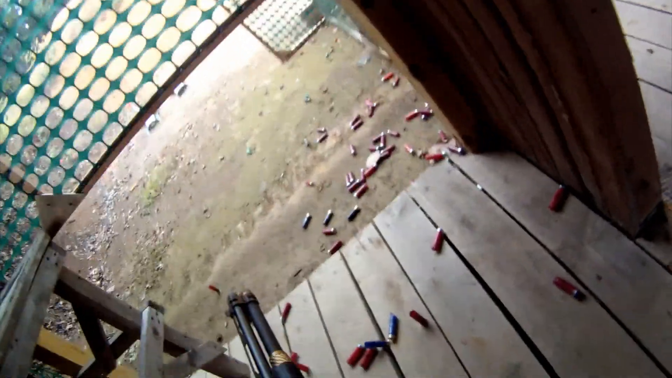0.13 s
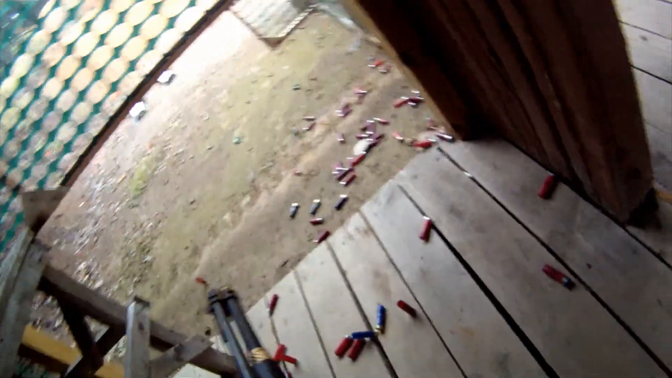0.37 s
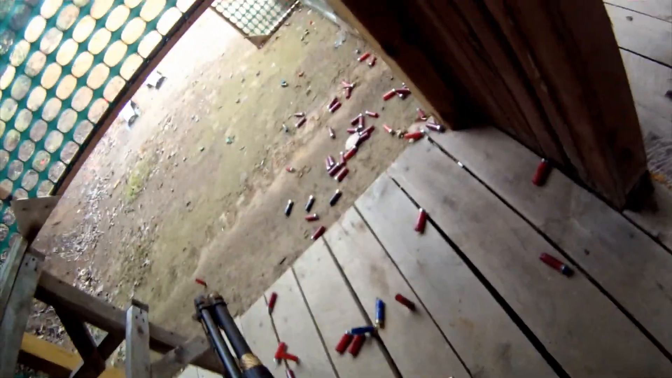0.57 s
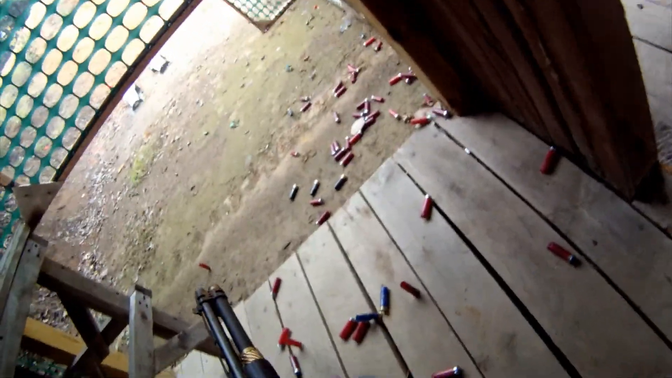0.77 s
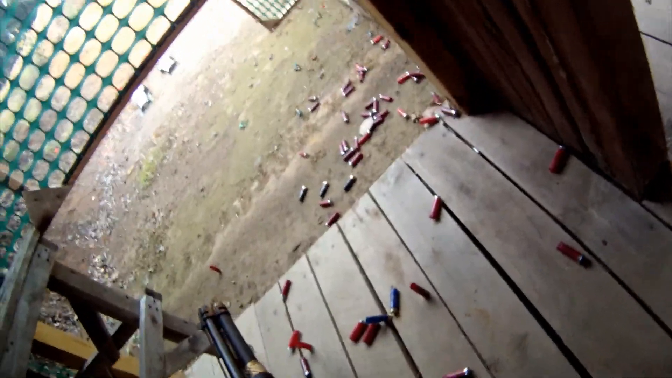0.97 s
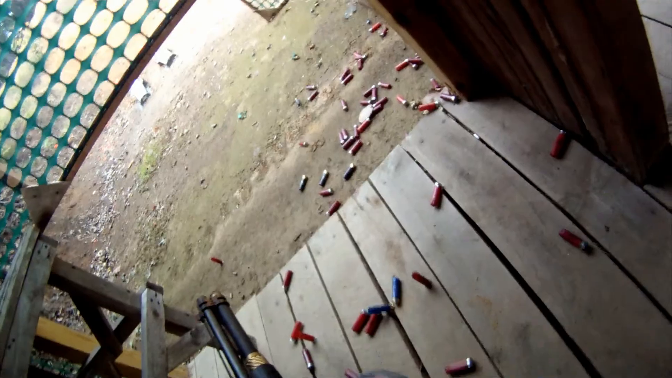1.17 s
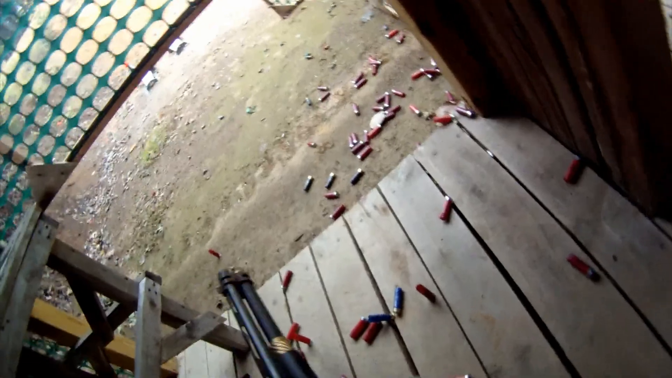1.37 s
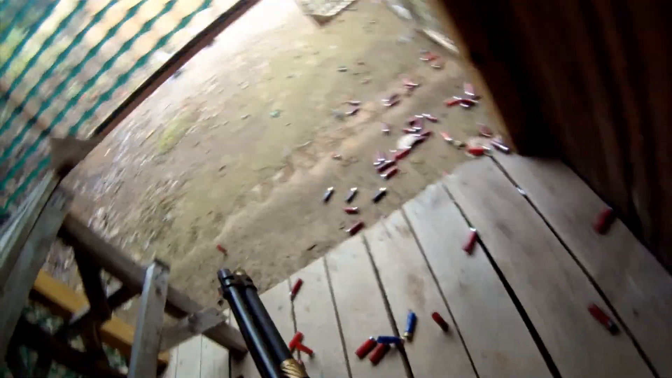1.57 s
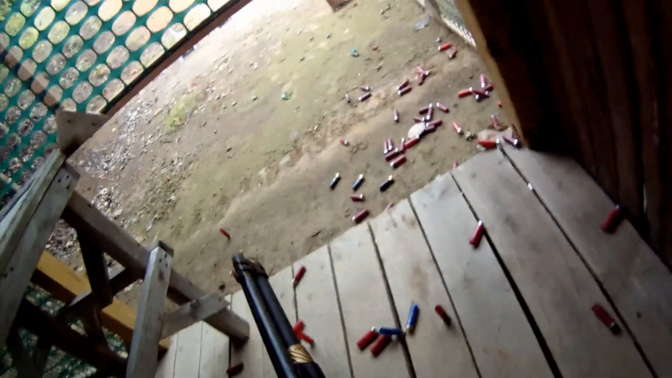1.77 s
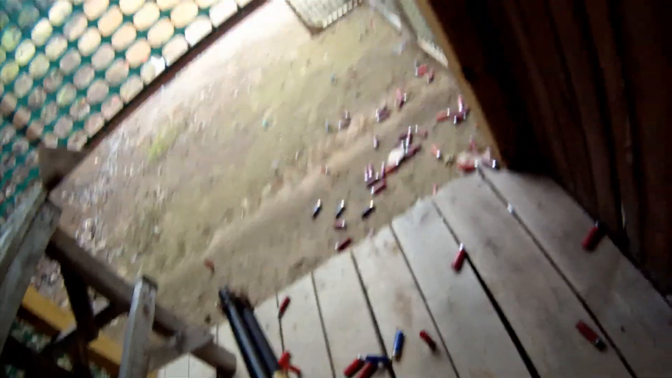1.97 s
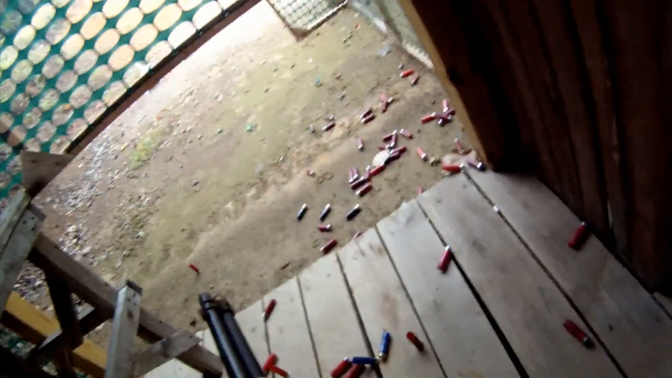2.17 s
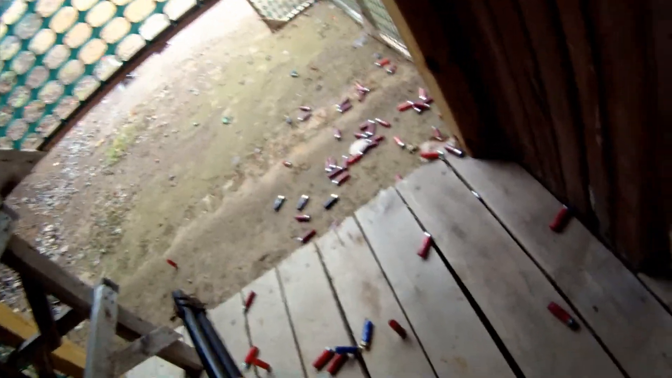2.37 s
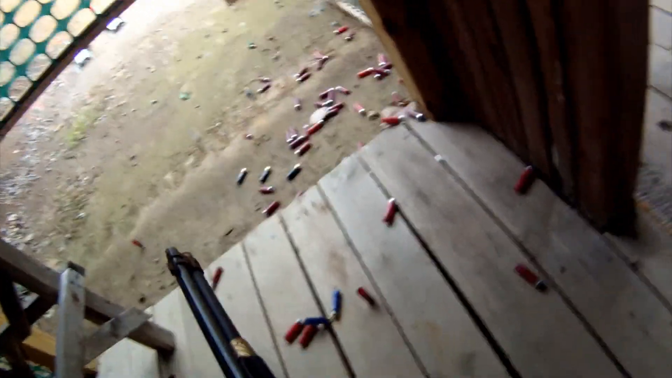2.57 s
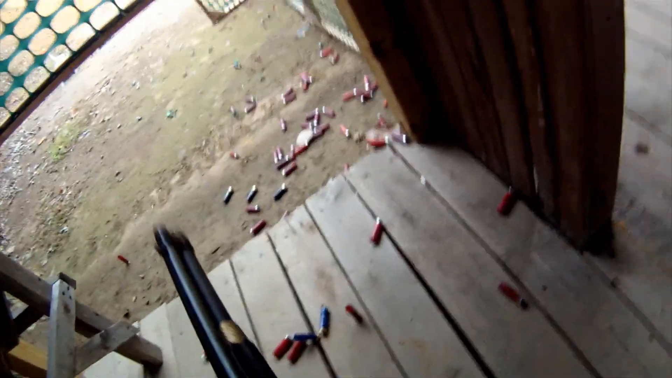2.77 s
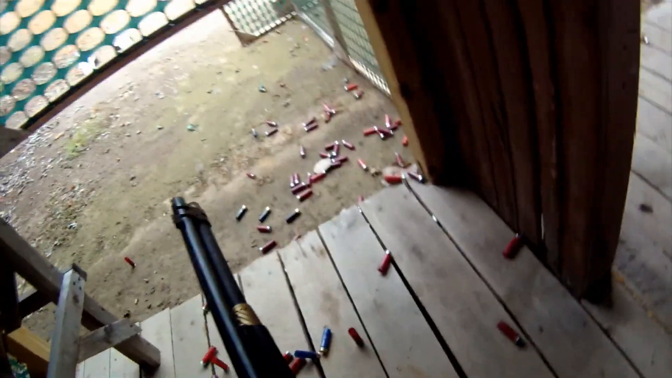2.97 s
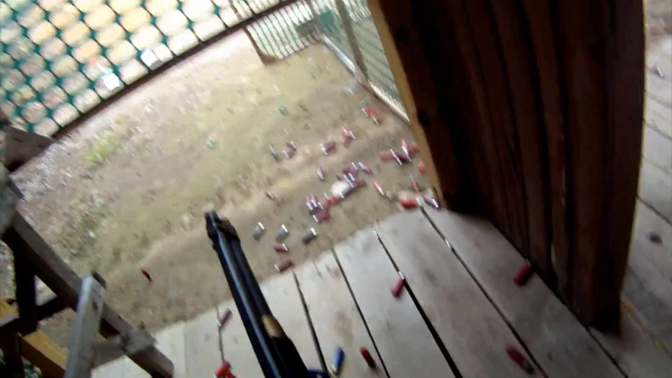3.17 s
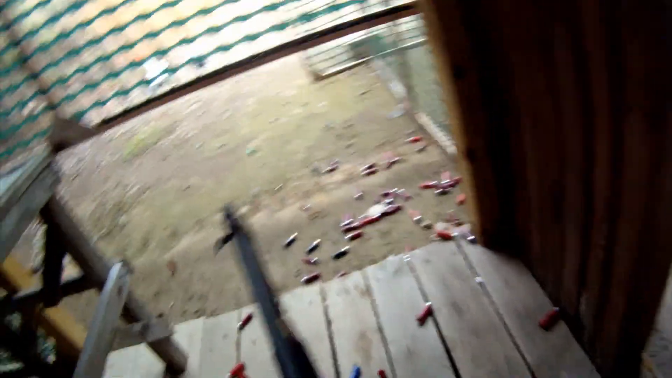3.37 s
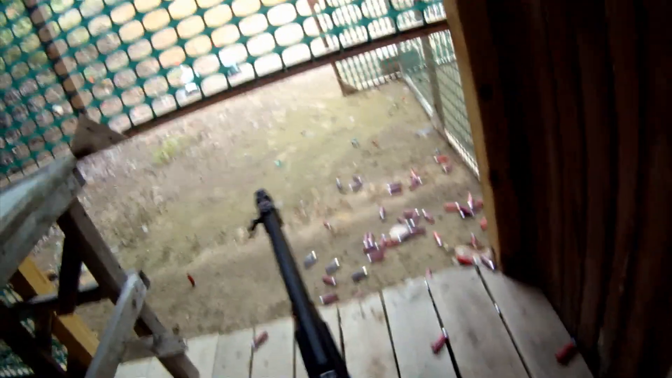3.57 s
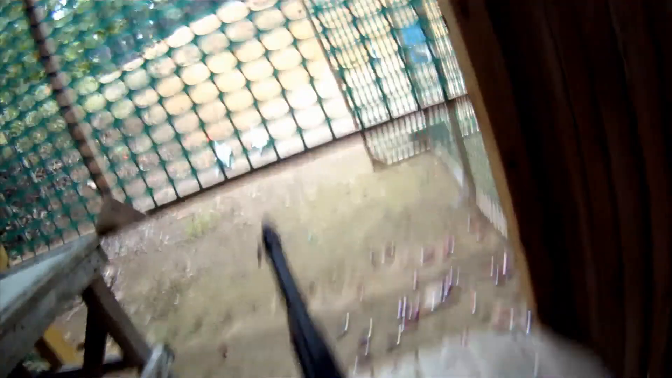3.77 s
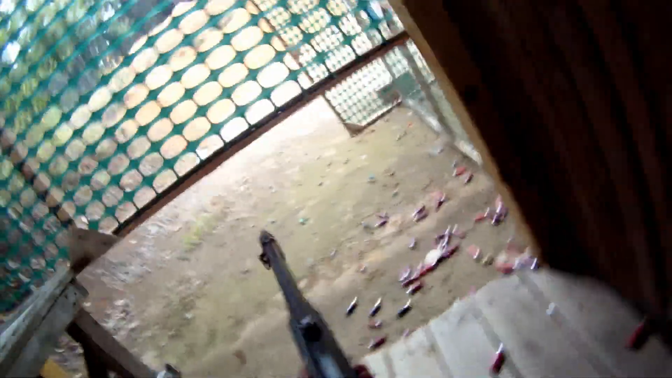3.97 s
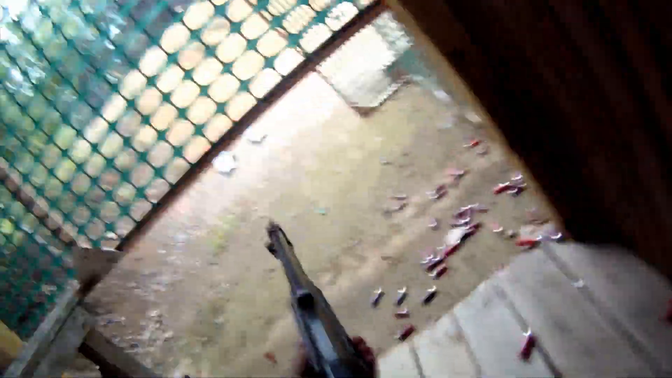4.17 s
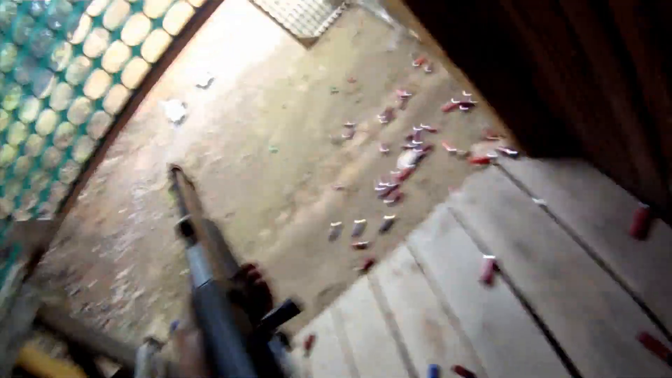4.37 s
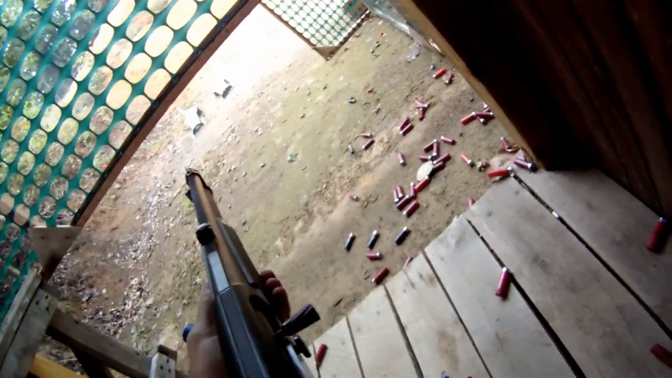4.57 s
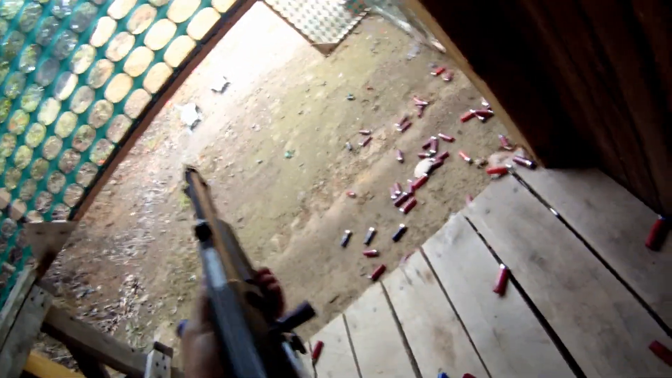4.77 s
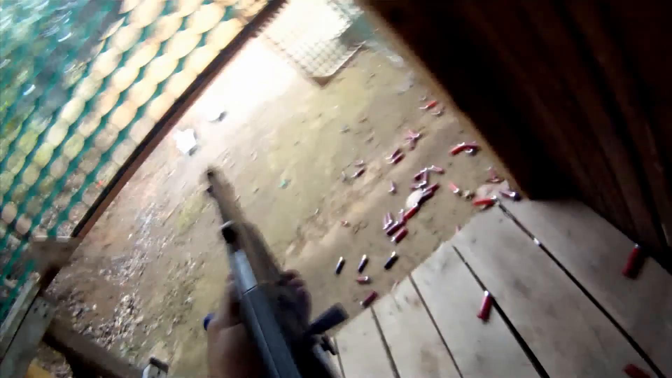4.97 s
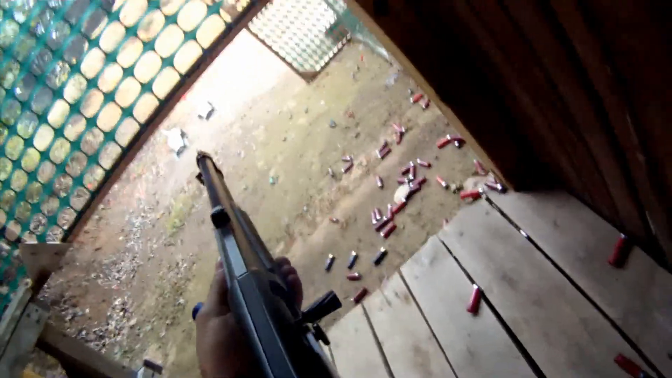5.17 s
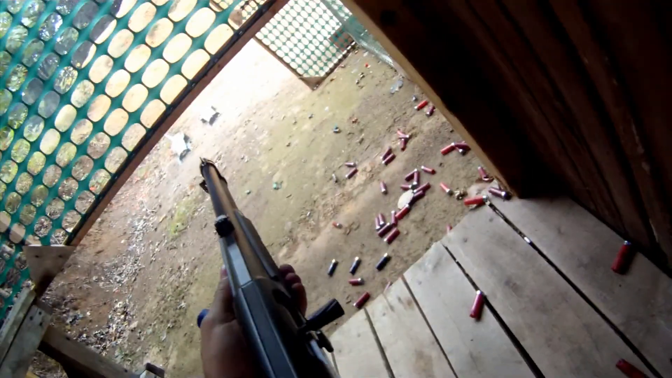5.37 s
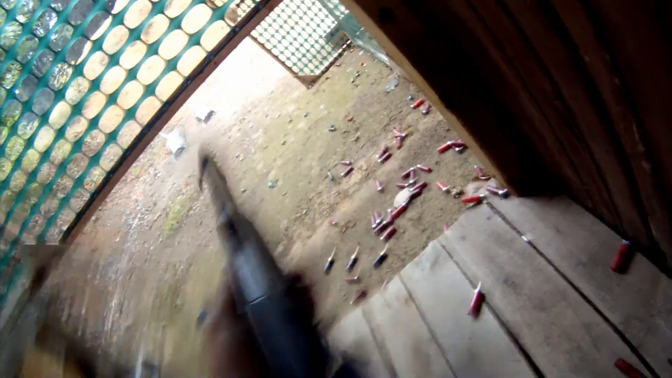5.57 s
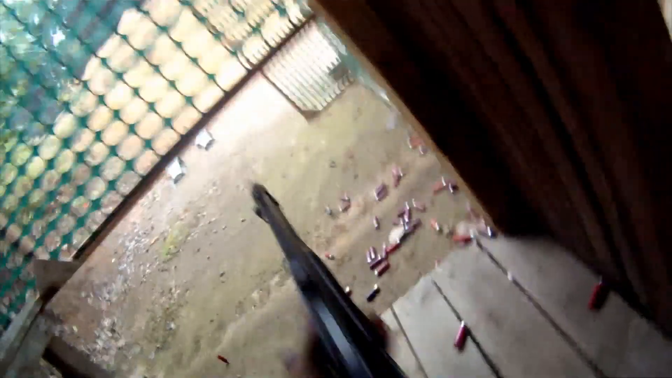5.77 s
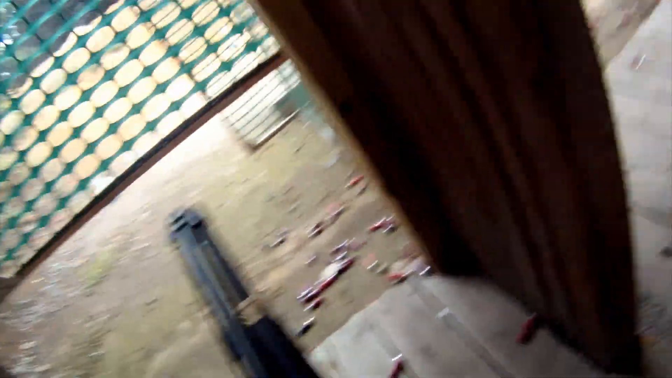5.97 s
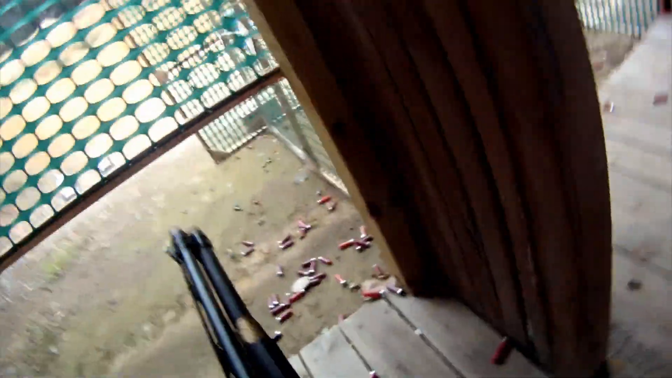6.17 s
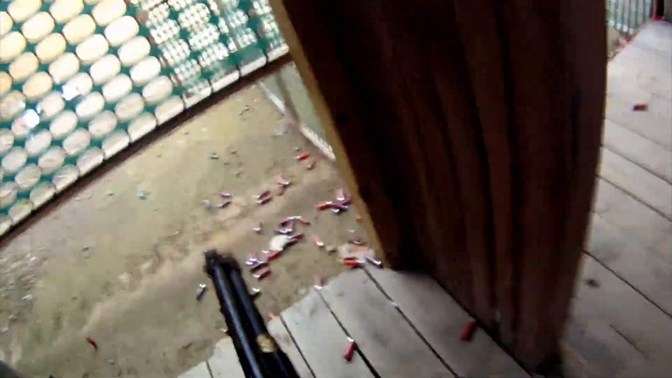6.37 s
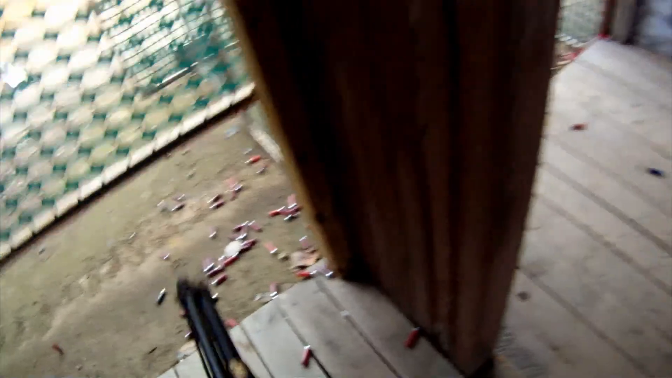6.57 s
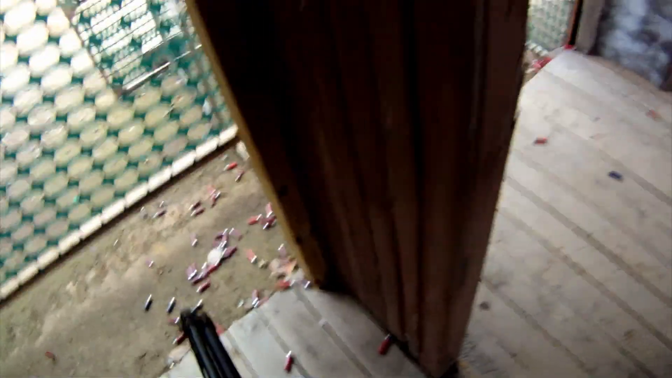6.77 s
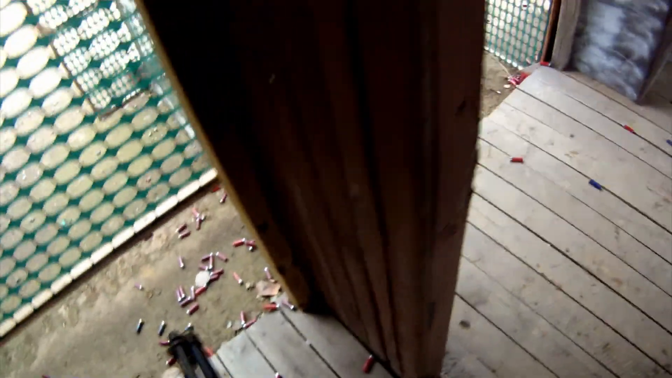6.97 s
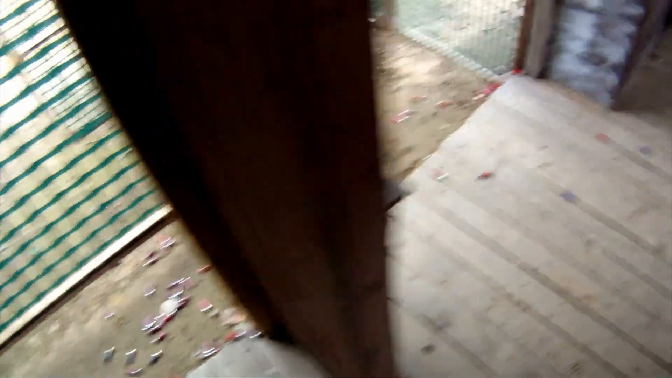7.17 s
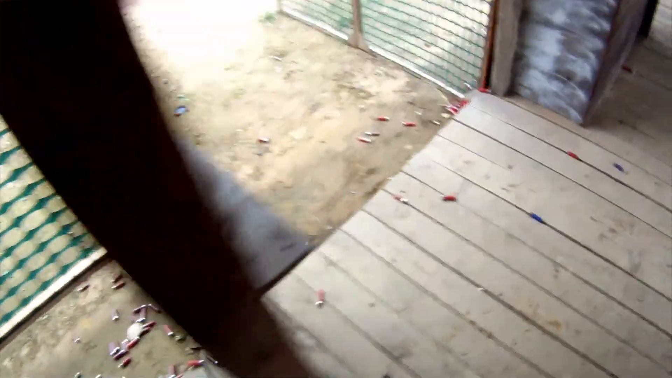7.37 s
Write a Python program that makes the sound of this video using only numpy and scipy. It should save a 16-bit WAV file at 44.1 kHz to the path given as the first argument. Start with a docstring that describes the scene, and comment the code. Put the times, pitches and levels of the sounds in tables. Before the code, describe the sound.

Gun parts clack and cloth rustles in a wooden stand, then two overloaded shotgun blasts crack close by, each rolling into a long outdoor echo.

```python
"""At a wooden shooting stand, a shotgun fires twice close to a small stereo camera that overloads.
Shaped, dying noise makes the crack, the brief ring of the stand and the later, longer answer of the range.
Gun parts click (noise and damped sines), cloth rustles and rubs (noise), a board creaks (ringing modes).
Behind them are wind rumble (slow noise), a far engine and a faint thin tone (wavering sines), and hiss."""
import sys
import numpy as np
from scipy import signal
from scipy.fft import rfft, irfft, next_fast_len
from scipy.io import wavfile
from scipy.ndimage import uniform_filter1d, map_coordinates

SR = 44100
rng = np.random.default_rng(int(sys.argv[2]) if len(sys.argv) > 2 else 0)


def log_audio(samples):
    """Write samples as a 16-bit WAV file to the path given in sys.argv[1]."""
    # one column per channel
    frames = np.atleast_2d(samples).T
    # limit to full scale, then quantise
    limited = np.clip(frames, -1, 1)
    pcm = np.round(limited * 32767).astype(np.int16)
    wavfile.write(sys.argv[1], SR, pcm)


N = 327857  # length in samples


def amp(db):
    """Turns decibels into a gain."""
    return 10 ** (np.asarray(db) / 20)


def unit(x):
    """Scales a sound to rms 1."""
    return x / np.sqrt(np.mean(x ** 2) + 1e-20)


def along(points, hz):
    """Reads a value at each frequency from (f/Hz, value) points, on a log axis."""
    f, v = np.transpose(points)
    return np.interp(np.log(hz + 1), np.log(f + 1), v)


def curves(rows):
    """Draws one value per sample for each column after the time."""
    s, *cols = np.transpose(rows)
    return [np.interp(np.arange(N) / SR, s, c) for c in cols]


def wobble(rate):
    """Draws a smooth random curve through `rate` random points a second."""
    knots = rng.standard_normal(int(N * rate / SR) + 4)
    return map_coordinates(knots, [np.arange(N) * rate / SR])


def band(hz, octaves):
    """A bell-shaped spectrum round hz, 12 dB down at `octaves` to either side."""
    return [(hz * 2 ** (k * octaves), -12 * k * k) for k in (-3, -2, -1, 0, 1, 2, 3)]


def ring(hz, t60, t):
    """A damped sine that falls 60 dB in t60 seconds."""
    return np.sin(2 * np.pi * hz * t) * amp(-60 * t / t60)


def add(out, s, x):
    """Mixes x into out from second s on."""
    part = out[:, round(s * SR):][:, :x.shape[1]]
    part += x[:, :part.shape[1]]


# How alike the left and right ports hear each pitch: f/Hz, likeness (1 = same, 0 = unrelated)
LIKENESS = [(60, 1), (99, 0.96), (160, 1), (270, 0.99), (450, 0.97), (740, 0.93), (1220, 0.79),
            (2010, 0.48), (3330, -0.36), (5500, -0.0049), (9080, -0.04), (15000, 0.55)]


def rush(spectrum, size, apart=0):
    """Coloured noise of rms 1 at two close microphone ports; `apart` makes them less alike."""
    m = next_fast_len(size)
    hz = np.fft.rfftfreq(m, 1 / SR)
    turn = np.arccos(np.clip(along(LIKENESS, hz) * (1 - apart), -1, 1)) / 2
    closed = [(0, -120)] + list(spectrum)  # next to nothing at 0 Hz
    white = rfft(rng.standard_normal((2, m)))
    mid, side = irfft(white * amp(along(closed, hz)) * [np.cos(turn), np.sin(turn)], m)
    return unit(np.array([mid + side, mid - side])[:, :size])


def dying(spectrum, decay, size, rise, apart=0, patchy_db=0):
    """Noise that swells over about `rise` seconds while each pitch dies at its own speed, in patches."""
    hz, t, z = signal.stft(rush(spectrum, size, apart), SR, nperseg=256)
    patches = rng.standard_normal(z.shape[1:])
    for axis in (0, 1):  # smooth over pitch, then over time
        patches = uniform_filter1d(patches, size=5, axis=axis)
    fade_db = -60 * t / along(decay, hz)[:, None]
    faded = z * amp(fade_db + patchy_db * unit(patches))
    tail = signal.istft(faded, SR, nperseg=256)[1][:, :size]
    return tail * (1 - np.exp(-(np.arange(size) / SR / rise) ** 2))


# Colour of the microphones' own hiss: f/Hz, relative level/dB
HISS_COLOUR = [(1470, -47.5), (2500, -20), (4810, -20), (5910, -3.5), (11100, -0.5), (13400, -4.5),
               (14500, -26.5)]


def microphone_hiss():
    """The microphones' own noise is a steady, bright hiss."""
    return amp(-83) * rush(HISS_COLOUR, N)


# Strength of the wind over time: t/s, level/dB
WIND_LEVEL = [(0, -56.5), (1.6, -56), (2.7, -58.5), (3.7, -56.5), (4.2, -52), (4.8, -58.5), (6.7, -56),
              (7.15, -52.5), (7.43, -55)]
# Colour of the low rumble: f/Hz, relative level/dB
RUMBLE_COLOUR = [(4.7, -41.5), (8.0, 0.5), (22, -0.5), (43, -18), (81, -15.5), (160, -28.5), (177, -33),
                 (211, -30.5), (500, -42.5), (650, -82.5), (1100, -120)]


def wind():
    """Light wind is deep noise that comes in lumps, about six random points a second."""
    wind_db, = curves(WIND_LEVEL)
    return amp(wind_db) * unit(amp(1.4 * wobble(6.1)) * rush(RUMBLE_COLOUR, N))


SHAFT_START_HZ, SHAFT_END_HZ, SLOWING_S = 42.8, 37.5, 0.97  # SLOWING_S: time constant
# Multiples of the shaft speed: order, starting level/dB, change of level/(dB per s)
ENGINE_ORDERS = [(2, -62.5, -3), (3, -69.5, -2)]


def engine():
    """A far engine settles to a slower speed; multiples of its shaft speed hum unsteadily and fade."""
    t = np.arange(N) / SR
    shaft_hz = SHAFT_END_HZ + (SHAFT_START_HZ - SHAFT_END_HZ) * np.exp(-t / SLOWING_S)
    turns = 2 * np.pi * np.cumsum(shaft_hz) / SR
    out = np.zeros(N)
    for order, db, fade_db in ENGINE_ORDERS:
        level = amp(db + fade_db * t + 4 * wobble(8))
        out += level * np.sin(order * turns + .9 * wobble(12))
    return out


WHINE_HZ, WHINE_DB = 782, -80
WHINE_FULL_FROM_S, WHINE_FULL_TO_S, WHINE_FADE_S = 2.9, 4.55, 0.33  # the fades lie outside the full part


def whine():
    """A faint thin tone is a sine whose level and phase waver."""
    t = np.arange(N) / SR
    nearest_edge = np.minimum(t - WHINE_FULL_FROM_S, WHINE_FULL_TO_S - t)
    on = np.clip(nearest_edge / WHINE_FADE_S + 1, 0, 1) ** 2
    tone = np.sin(2 * np.pi * WHINE_HZ * t + 1.5 * wobble(10))
    return on * amp(WHINE_DB + 3.3 * wobble(7.94)) * tone


# How busily the gun is handled: t/s, level/dB of the cloth's body
HANDLING_LEVEL = [(0, -64.5), (.2, -77), (.9, -72.5), (1.35, -63), (1.75, -70), (2.12, -83), (2.4, -79.5),
                  (2.75, -62.5), (3.0, -73), (3.36, -62.5), (3.69, -65.5), (3.85, -73.5), (4.29, -68.5),
                  (4.55, -78), (4.86, -86.5), (6.6, -58.5), (6.8, -64.5), (7.05, -60.5), (7.3, -62),
                  (7.43, -72)]
# Body of the cloth sound: f/Hz, relative level/dB
CLOTH_BODY = [(88, -42), (150, -12), (330, -12), (376, -15), (480, -5), (1770, -10.5), (3300, -19),
              (4290, -53.5), (7260, -120)]
# Bright part of the cloth sound: f/Hz, relative level/dB
CLOTH_BRIGHT = [(1760, -38.5), (3000, -14.5), (3420, 5), (3710, 4), (6690, -4.5), (11100, -3.5),
                (15400, -26)]
BRIGHT_UNDER_BODY_DB = -7.5


def rustle():
    """Shifting cloth and gear make grainy noise with a wavering bright part."""
    cloth_db, = curves(HANDLING_LEVEL)
    body = unit(amp(1.5 * wobble(59)) * rush(CLOTH_BODY, N))
    bright = amp(BRIGHT_UNDER_BODY_DB + 2.5 * wobble(5)) * rush(CLOTH_BRIGHT, N)
    return amp(cloth_db) * (body + bright)


# Soft rubs of cloth, stock and boards: start t/s, length/s, centre f/Hz, width/octaves, level/dB
RUBS = [(0.032, 0.13, 292, 0.52, -69), (0.057, 0.056, 4500, 1.9, -65), (.535, 0.075, 4500, .9, -72),
        (0.524, 0.058, 1000, 1.16, -65.5), (.757, 0.042, 1200, .95, -70), (0.833, 0.056, 350, 0.57, -67),
        (0.937, .17, 1070, 1.26, -57.5), (0.953, 0.15, 5740, 2.8, -61.5), (1.296, .074, 2470, 4.5, -31.5),
        (1.387, 0.11, 5000, 1.7, -60), (1.501, 0.088, 930, 0.63, -58.5), (1.791, 0.11, 955, 1.03, -61),
        (2.194, 0.026, 445, 0.93, -69), (3.107, 0.1, 1690, 0.53, -50.5), (3.131, 0.09, 8550, 2.7, -48),
        (3.832, 0.07, 910, 0.45, -60), (4.256, 0.022, 770, 0.55, -55.5), (3.85, 0.087, 192, .6, -69.5),
        (4.137, .022, 865, .16, -65), (4.863, 0.011, 1085, 0.57, -59.5), (6.425, .045, 145, 0.53, -47.5)]


def scuffs():
    """Each rub is a band of noise that swells and fades, loudest just past its middle."""
    out = np.zeros((2, N))
    for s, length, hz, octaves, db in RUBS:
        u = np.arange(max(SR // 4, round(length * SR))) / SR / length  # share of the rub
        swell = np.abs(np.sin(np.pi * np.minimum(u, 1) ** 1.14)) ** 0.78
        add(out, s, amp(db) * rush(band(hz, octaves), len(u)) * swell)
    return out


CREAK_S, CREAK_LENGTH_S, CREAK_DB, SLIPS_PER_S = 7.095, .2, -53, 89
MODE_SPAN = 0.23  # share of the creak over which a mode speaks
# Ringing modes of the board: f/Hz, relative level/dB, loudest at this share of the creak, t60/s
BOARD_MODES = [(306, 4, 0.74, .07), (428, 1.5, 0.59, 0.058), (540, 0, 0.94, .05), (630, 1, .25, .07),
               (873, 1.5, 0.34, 0.047), (1067, -4, .1, 0.034)]


def creak():
    """A floor board gives under a foot: uneven slips ring its modes, darker as the weight settles."""
    out, t = np.zeros((2, N)), np.arange(SR // 10)[None] / SR
    starts = np.arange(0, CREAK_LENGTH_S, 1 / SLIPS_PER_S)
    for u, late, size in zip(starts, *rng.standard_normal((2, 64))):
        share = u / CREAK_LENGTH_S
        modes = 0
        for hz, db, at, t60 in BOARD_MODES:
            modes = modes + amp(db) * np.exp(-((share - at) / MODE_SPAN) ** 2) * ring(hz, t60, t)
        add(out, CREAK_S + u + 0.00052 * late, amp(CREAK_DB + 2.5 * size) * modes)
    return out


# Contacts of gun parts and gear: t/s, knock level/dB, knock f/Hz, treble level/dB,
# thud over the knock/dB, rattle t60/s (held to .03-.45 s), steel ring over the treble/dB
CONTACTS = [(1.169, -39, 1640, -41.5, -4, 0.34, -22), (1.19, -42.5, 1270, -42, -20, 0.2, -24),
            (1.2517, -36, 1555, -36, -7, 0.53, -26), (1.276, -34, 1860, -49, -5, 0.23, -24),
            (1.291, -32, 1070, -38, -3.5, 0.44, -18), (1.3255, -19, 2025, -19, -3.5, 0.21, -29),
            (1.3694, -37, 1700, -52, -2, 0.22, -17), (2.4355, -45, 1350, -67, 0, 0.25, -24),
            (2.582, -45, 1510, -54, -1.5, 0.34, -24), (2.673, -60, 1420, -48.5, 1, 0.35, -8),
            (2.7596, -39, 1610, -58, -5.5, 0.17, -24), (2.8631, -36, 2190, -33.5, -12, 0.23, -14),
            (2.9939, -42.5, 1720, -50, -2.5, 0.28, -15), (3.2033, -26.5, 1980, -33.5, -18.5, 0.27, -22),
            (3.2483, -34.5, 1700, -49, -13, 0.16, -11), (3.394, -48.5, 1090, -62, -1, 0.99, -24),
            (3.571, -50, 1700, -44.5, -12, 0.21, -12.5), (3.587, -45.5, 1210, -52.5, -6, 0.26, -22),
            (3.728, -52, 1610, -42, -11, 0.21, -20), (3.9098, -65, 1780, -76, 7, .15, -23),
            (4.0994, -59, 1800, -74, -3, 0.1, -24), (4.181, -78, 1300, -55.5, -13, 0.27, -16),
            (4.2352, -69, 1650, -53, 0, 0.13, -17), (4.305, -53.5, 1195, -75, 1, 0.23, -23),
            (4.408, -64, 1770, -56.5, 1, .25, -10), (5.293, -32.5, 1860, -46, -15, 0.079, -23),
            (5.567, -35, 1580, -44.5, -1.5, 0.5, -12), (6.1177, -44, 1440, -55, 9, 0.21, -26),
            (6.235, -44, 1100, -54, -12, 0.19, -24), (6.5017, -48.5, 1140, -46, -5, 0.27, -16.5),
            (6.6337, -34, 1650, -42.5, -20, 0.24, -28), (6.9347, -36, 1730, -45, -8.5, 0.3, -24),
            (6.982, -40, 1880, -41, -4.5, 0.34, -28), (7.188, -55.5, 1990, -53.5, 5, 0.37, -16),
            (7.3758, -40.5, 1386, -54, -11, 0.35, -24), (7.3928, -28.5, 1800, -32.5, -10, 0.35, -30)]
# Colour of the knock's noise: f/Hz, relative level/dB
KNOCK_COLOUR = [(600, -26.5), (1000, -14.5), (1700, -5.5), (2300, -7), (2800, -13), (4000, -36.5)]
# Colour of the thud: f/Hz, relative level/dB
THUD_COLOUR = [(100, -17), (170, -5), (400, -10.5), (800, 1.5), (1100, -7.5), (1600, -32)]
# Colour of the treble spray: f/Hz, relative level/dB
SPRAY_COLOUR = [(2400, -28), (3100, -9), (3900, -0.5), (6000, 0.5), (10000, -1.5), (13000, -2),
                (15500, -3.5)]
# Ringing modes of the steel: f/Hz, relative level/dB, t60/s
STEEL_MODES = [(5300, 1, .08), (6560, 2, .08), (8000, 4.5, .09), (9800, -2.5, 0.27), (10840, -13.5, 0.14),
               (12520, -14, .07)]
SNAP_DB, SNAP_T60_S = -0.5, 0.0065  # broad crack of each contact, over the knock
GEAR_LEFT_DB = 1.3  # left minus right, before the balance in scene()


def gear():
    """Contacts crack and knock at once; treble spray and steel ring build over a few ms in the stand."""
    out, t = np.zeros((2, N)), np.arange(SR * 2 // 5) / SR
    size = len(t)
    for s, db, knock_hz, treble_db, thud_db, t60, steel_db in CONTACTS:
        tail = amp(-60 * t / np.clip(t60, .03, .45))
        # loose parts chatter
        rattle = amp(3 * np.interp(t * 200, np.arange(size), rng.standard_normal(size)))
        body = .28 * rush(band(knock_hz, .22), size) + .33 * rush(KNOCK_COLOUR, size)
        tones = 0.6 * ring(knock_hz, 0.036, t)
        tones += 0.15 * ring(0.55 * knock_hz, 0.021, t) + 0.314 * ring(1.27 * knock_hz, 0.017, t)
        knock = tones + body * (1.5 * amp(-60 * t / 0.02) + 0.75 * rattle * tail)
        snap = amp(SNAP_DB - 60 * t / SNAP_T60_S) * rush(band(1.25 * knock_hz, .75), size)
        thud = rush(THUD_COLOUR, size) * (amp(-60 * t / 0.016) + 0.22 * tail)
        steel = 0
        for hz, level, life in STEEL_MODES:
            steel = steel + amp(level + rng.normal(0, 2.5, (2, 1))) * ring(hz, life, t)
        treble = rush(SPRAY_COLOUR, size) * rattle ** .7 * tail + amp(steel_db) * steel
        treble = treble * (1 - np.exp(-(t / .0035) ** 2))
        touch = 1 - np.exp(-(t / .0006) ** 2)  # a very quick start
        contact = (knock + snap + amp(thud_db) * thud) * touch
        add(out, s, amp(db) * contact + amp(treble_db) * treble)
    return out * amp([[GEAR_LEFT_DB / 2], [-GEAR_LEFT_DB / 2]])


# The two shots: t/s, blast level/dB in the stand, reference level/dB for the answer of the range
SHOT_TIMES = [(4.894, 20.5, -20.5), (5.6390, 19.5, -21)]
SHUDDER_DB, SHUDDER_RISE_S, SHUDDER_T60_S = -26.5, .15, 0.69


def shudder():
    """A low rumble swells after each shot and dies away."""
    out = np.zeros((2, N))
    for s, *_ in SHOT_TIMES:
        low = dying(RUMBLE_COLOUR, [(40, SHUDDER_T60_S)], size=SR * 2, rise=SHUDDER_RISE_S)
        add(out, s, amp(SHUDDER_DB) * low)
    return out


# Nearby ground and fences, colour: f/Hz, relative level/dB
YARD_COLOUR = [(1500, -30.5), (2500, -12), (3100, -10), (5500, -5), (8000, -4), (10500, 1), (13000, -4.5),
               (15600, -13.5)]
# Nearby ground and fences, dying away: f/Hz, t60/s
YARD_FADE = [(2500, 0.23), (5000, 0.67), (7500, 0.61), (10000, 0.51), (12500, .48), (15500, .45)]
# Answer of the range, colour: f/Hz, relative level/dB
RANGE_COLOUR = [(15, -38.5), (25, -16.5), (60, -20.5), (120, -22), (200, -14), (320, -20), (520, -9.5),
                (820, -15.5), (1850, -15), (2550, -21.5), (2900, -24), (5500, -30.5), (8000, -45),
                (12000, -78)]
# Answer of the range, dying away: f/Hz, t60/s
RANGE_FADE = [(40, 0.41), (150, 1), (500, .8), (1500, 0.71), (4000, 0.72), (7000, 0.81), (11000, 0.96),
              (15000, 0.26)]
# Far woods, colour: f/Hz, relative level/dB
WOODS_COLOUR = [(25, 1), (70, -1.5), (200, -16.5), (500, -11), (1200, -12), (2500, -15), (5000, -42.5),
                (15000, -68.5)]
# Far woods, dying away: f/Hz, t60/s
WOODS_FADE = [(40, 3.7), (300, 2.5), (1000, 1.9), (4000, 0.93)]


def range_answer():
    """Echoes off yard, range and far woods blur into noise that swells, then dies pitch by pitch."""
    out = np.zeros((2, N))
    for s, _, range_db in SHOT_TIMES:
        yard = dying(YARD_COLOUR, YARD_FADE, size=SR, rise=0.45, patchy_db=2.0)
        add(out, s, amp(range_db + 19.0) * yard)
        answer = dying(RANGE_COLOUR, RANGE_FADE, size=SR * 2, rise=0.29, patchy_db=1.0)
        add(out, s, amp(range_db + 21) * answer)
        woods = dying(WOODS_COLOUR, WOODS_FADE, size=SR * 2, rise=.3, patchy_db=1.5)
        add(out, s, amp(range_db - 8.5) * woods)
    return out


# Slaps off the banks of the range: delay t/s, level/dB before a gain of 0.39 and a random change
BANK_SLAPS = [(.256, -23), (.29, -9.5), (.302, -10.5), (.32, -11), (.35, -15), (.41, -25), (.44, -21),
              (.478, -23.5), (.59, -31)]


def slaps():
    """Each bank throws back a short dull burst, as distance leaves only the low mids."""
    out, t = np.zeros((2, N)), np.arange(SR // 20)[None] / SR
    for s, *_ in SHOT_TIMES:
        for delay, db in BANK_SLAPS:
            noise = 0.39 * rush(band(531, 0.39), SR // 4)[:, :t.size]
            dull = noise * amp(-60 * t / 0.067) * np.minimum(t / 0.0034, 1)
            add(out, s + delay, amp(db + rng.normal(0, 1.3)) * dull)
    return out


# Bright crack of the blast, colour: f/Hz, relative level/dB
BLAST_COLOUR = [(20, -11), (150, -11.5), (500, -4), (1500, -0.5), (2500, -2.5), (4000, -6), (9000, -11),
                (12000, -10), (16000, -9)]
# Ring of the stand, dying away: f/Hz, t60/s
STAND_FADE = [(40, 0.25), (800, .22), (2500, .2), (6000, 0.26), (10000, 0.24), (15000, 0.23)]
# Boom of the boards, colour: f/Hz, relative level/dB
BOOM_COLOUR = [(20, -11), (45, -7), (70, -12), (130, -6.5), (210, -7), (330, 0), (600, -2), (1000, -2),
               (1500, -7), (2600, -11.5), (4000, -45)]
# Boom of the boards, dying away: f/Hz, t60/s
BOOM_FADE = [(40, .35), (200, 0.19), (800, 0.25), (2500, 0.21)]


def shots():
    """The hammer falls, the first wave shakes the camera case, then crack and boom fill the stand."""
    out, t = np.zeros((2, N)), np.arange(SR // 20)[None] / SR
    for s, blast_db, _ in SHOT_TIMES:
        add(out, s - .0075, amp(-29.5) * ring(760, .04, t))  # hammer
        add(out, s, -amp(7) * ring(720, 0.03, t) * np.minimum(t / 0.0015, 1))  # shaken case
        roar_s = s + .0025
        crack = dying(BLAST_COLOUR, STAND_FADE, size=SR // 2, rise=0.0012, apart=.1)
        add(out, roar_s, amp(blast_db) * crack)
        # the boom builds up more slowly than the crack
        boom = dying(BOOM_COLOUR, BOOM_FADE, size=SR // 2, rise=0.043, apart=0.21)
        add(out, roar_s, amp(blast_db + 4.5) * boom)
    return out


def scene():
    """Adds all sources; the left port hears 0.8 dB less than the right."""
    background = microphone_hiss() + wind() + engine() + whine()
    handling = rustle() + scuffs() + creak() + gear()
    firing = shudder() + range_answer() + slaps() + shots()
    return (background + handling + firing) * amp([[-.4], [.4]])


# Tone of the microphone chain: f/Hz, gain/dB
MICROPHONE_TONE = [(100, -1), (8000, -1.5), (12000, -1), (16000, -12.5)]
TOP_HZ = 15700  # middle of the 400 Hz wide upper edge


def record(dry):
    """The overloaded input flattens peaks near 1.05; tone is coloured and the highest treble removed."""
    flat = dry / (1 + np.abs(dry / 1.05) ** 10) ** (1 / 10)
    m = next_fast_len(N + SR)
    hz = np.fft.rfftfreq(m, 1 / SR)
    edge = np.clip((TOP_HZ - hz) / 400 + .5, 0, 1)
    gain = amp(along(MICROPHONE_TONE, hz)) * np.sin(edge * np.pi / 2) ** 2
    return irfft(rfft(flat, m) * gain, m)[:, :N]


dry = scene()
out = record(dry)
log_audio(out)
```